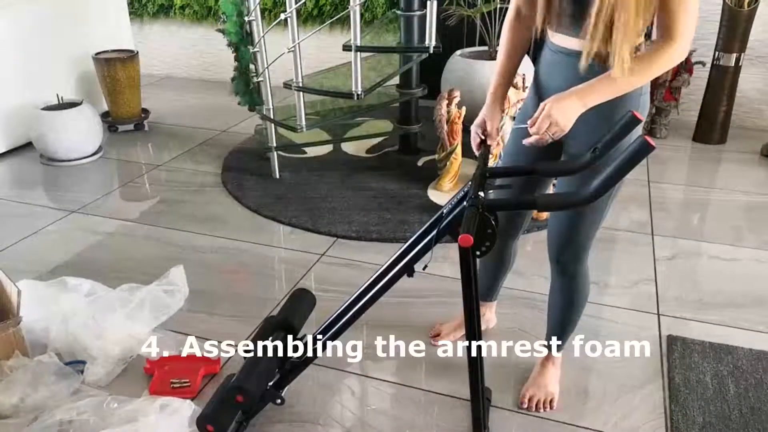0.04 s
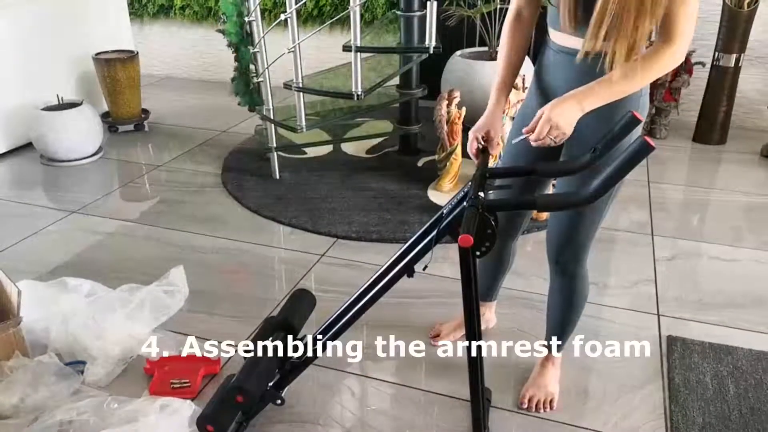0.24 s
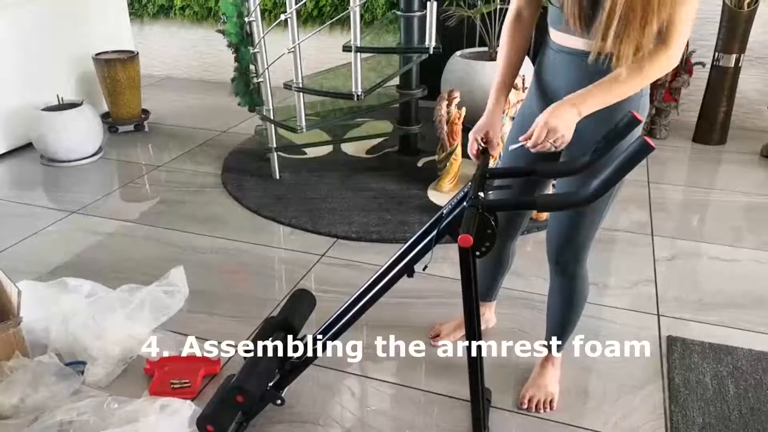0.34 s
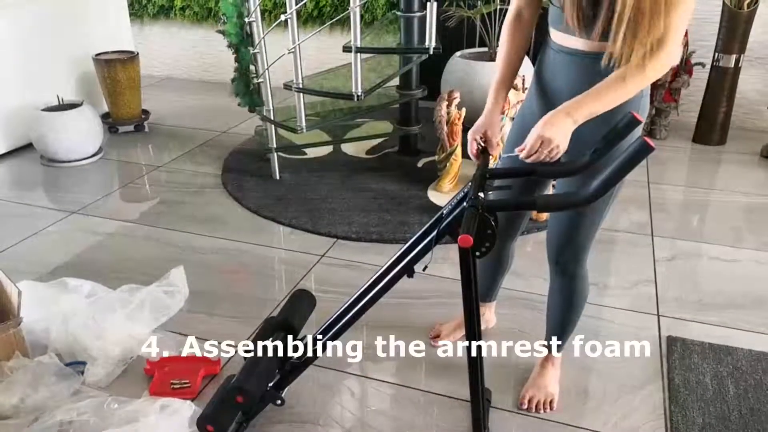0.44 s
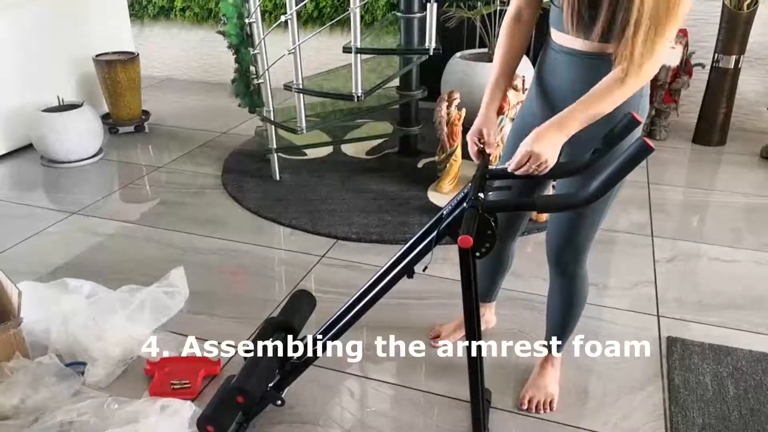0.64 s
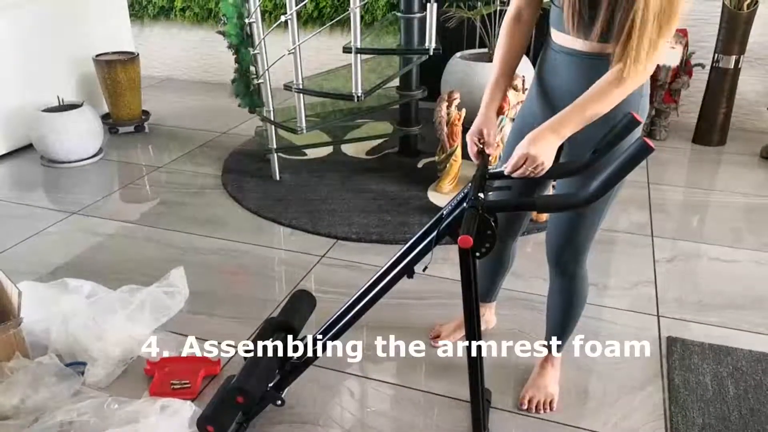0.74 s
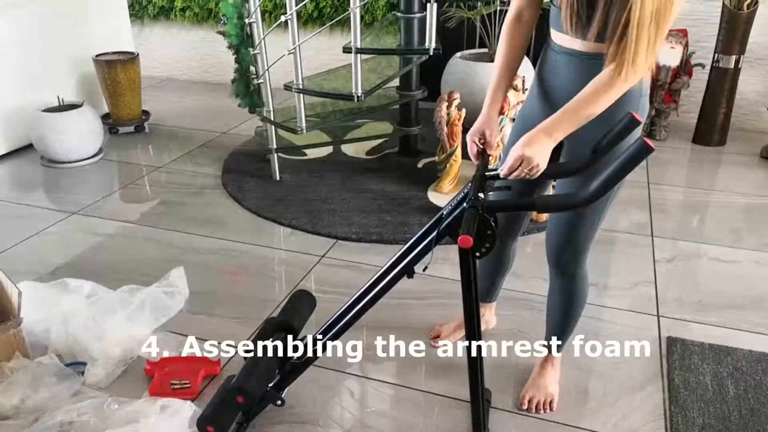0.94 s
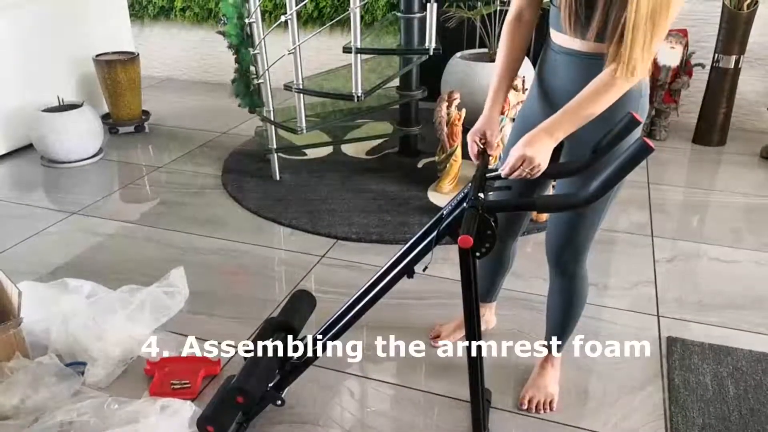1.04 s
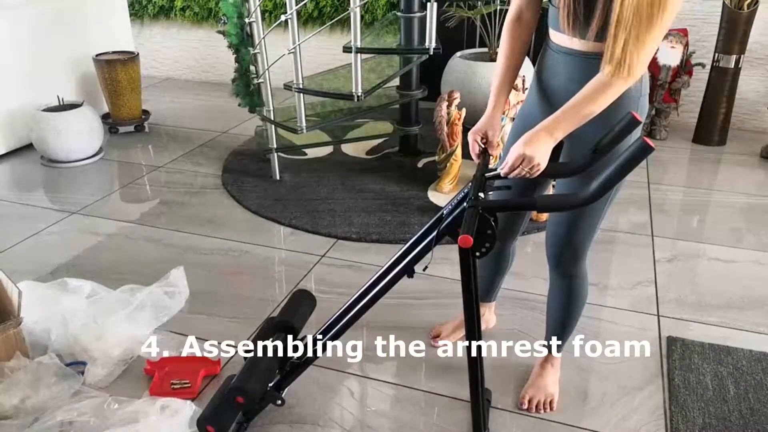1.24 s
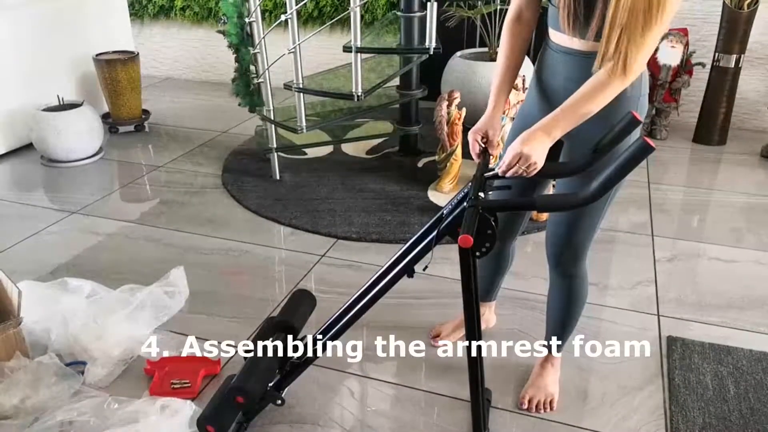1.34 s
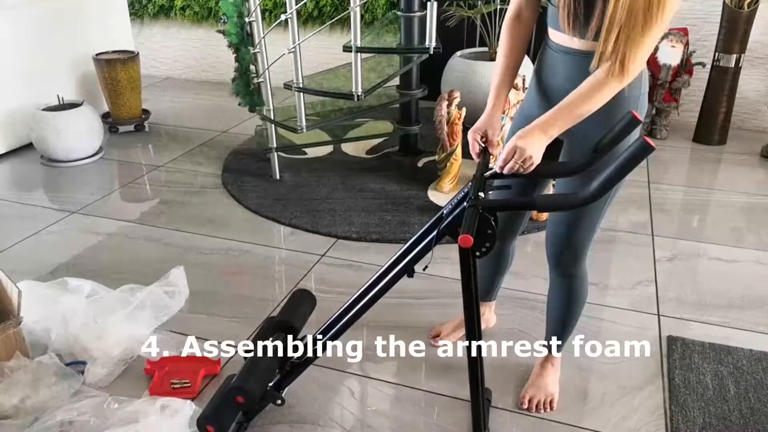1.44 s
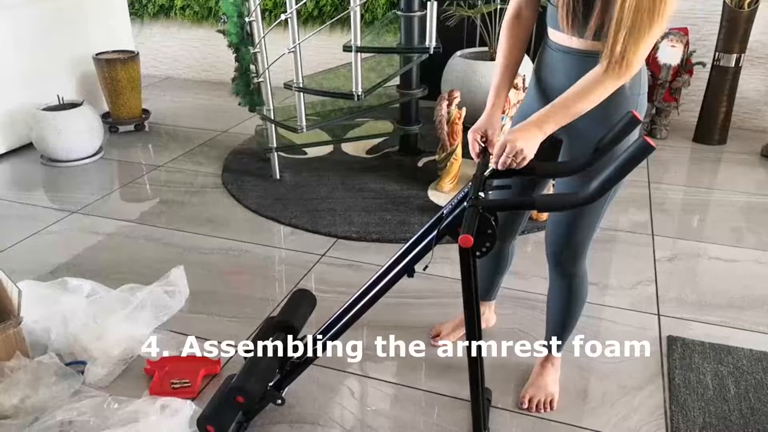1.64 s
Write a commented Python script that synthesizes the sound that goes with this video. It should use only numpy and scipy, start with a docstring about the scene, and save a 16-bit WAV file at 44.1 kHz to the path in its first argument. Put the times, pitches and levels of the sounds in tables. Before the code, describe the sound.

In a tiled room, a brief ringing metal scrape with a thin squeal ends in a soft bump as a part is pushed along a tube frame. Soft hand rubs and a few light clicks follow.

```python
"""A metal part is pushed along the tube frame of an exercise machine in a tiled room.
It scrapes in stick-slip pulses that ring the tube, squeals as the contact locks on to a mode,
then judders to a stop and shakes the frame. Hands rub softly over the parts and small
fittings click, over a faint room rumble."""
import sys
import numpy as np
from scipy import signal
from scipy.fft import rfft, irfft
from scipy.io import wavfile
from scipy.ndimage import uniform_filter1d

SR = 44100
rng = np.random.default_rng(int(sys.argv[2]) if len(sys.argv) > 2 else 0)


def persist_wave(psi):
    """Save psi, clipped to +-1, as 16-bit WAV."""
    counts = np.round(np.clip(psi, -1, 1) * 32767).astype(np.int16)
    wavfile.write(sys.argv[1], SR, np.atleast_2d(counts).T)


N = 74970
T, F = np.arange(N) / SR, np.arange(N // 2 + 1) * SR / N

# Course of the push. Each row: time in seconds, level in dB, slips per second, treble in dB.
PUSH_CURVE = [(0.318, -62, 230, 1), (0.336, -38, 230, 2.5), (.36, -46.5, 200, 10), (.425, -41, 190, 1.5),
              (0.457, -39, 180, 0), (0.496, -46.5, 190, 5), (0.539, -36, 150, -7), (0.563, -37.5, 120, -7),
              (0.594, -45.5, 145, -5.5), (0.643, -46, 145, -15), (.67, -61, 140, 3.5), (0.719, -69, 140, 3)]
# Tube modes. Each row: frequency in Hz, width in Hz, level in dB.
TUBE_MODES = [(805, 30, -9), (1140, 80, -8), (1805, 22, 1), (1872, 35, 1), (2050, 25, -3), (2240, 25, -3),
              (2328, 30, -2), (2430, 90, 0), (2822, 30, -2), (3405, 35, -4), (3620, 35, -4), (4015, 60, -8),
              (4760, 100, -11.5), (5300, 70, -12), (5735, 50, -16)]
# Dense frame resonances. Each row: frequency in Hz, level in dB.
FRAME_SPECTRUM = [(100, -27), (400, -14.5), (600, -15), (780, -8), (1450, -8.5), (1950, 0), (2600, 0.5),
                  (3100, -8.5), (5500, -12.5), (6500, -19.5), (7700, -11), (8400, -30.5), (14000, -65.5)]
def scrape():
    """Uneven slips, each a short burst of grit, ring the tube and the frame."""
    slip_decay_s, scatter_db, jitter, steady_grit = 0.00068, 0.2, .15, 0.25
    centre_share, frame_gain = 0.54, amp(-1)
    times_s, db, rate_hz, treble_db = np.array(PUSH_CURVE).T
    slip_hz = np.interp(T, times_s, rate_hz)
    slips = np.cumsum(slip_hz * np.exp(jitter * wander(150))) / SR
    slip_size = amp(scatter_db * rng.standard_normal(N))[slips.astype(int)]
    since_slip_s = slips % 1 / slip_hz
    grit = np.sqrt(centre_share) * rng.standard_normal((2, 1, N))  # alike left and right
    grit = grit + np.sqrt(1 - centre_share) * rng.standard_normal((2, 2, N))
    force = unit(grit * (slip_size * np.exp(-since_slip_s / slip_decay_s) + steady_grit))
    force = force * amp(np.interp(T, times_s, db, left=-120, right=-120))
    tube_force, frame_force = shelf(force, np.interp(T, times_s, treble_db), hz=3160)
    tube = np.array([ring(TUBE_MODES), ring(TUBE_MODES)])
    frame = energy(colour(signal.unit_impulse(N), FRAME_SPECTRUM))
    return (conv(tube_force, tube) + frame_gain * conv(frame_force, frame)) / np.hypot(1, frame_gain)


# Squeals. Each row: start in seconds, length in seconds, pitch in Hz, level in dB, waver as a share.
SQUEAL_EVENTS = [(.333, .015, 2841, -43.5, .006), (.374, .007, 2835, -45, .004),
                 (.385, .025, 2838, -41, .003), (.425, .086, 2820, -45.5, .003),
                 (.511, .02, 5738, -57, .003), (.572, .087, 5735, -67, .003), (.45, .012, 1090, -44, .04),
                 (.448, .02, 1850, -46, .02), (.22, .008, 1720, -48, .05), (.231, .024, 1730, -56, .05)]
def squeals():
    """The contact locks on to one mode for a moment and sings with a wavering pitch."""
    attack_s, release_s, flutter_db = 0.0048, 0.0014, 1.7
    out = 0
    for start_s, length_s, hz, db, waver in SQUEAL_EVENTS:
        t = T - start_s
        envelope = np.clip(t / attack_s, 0, 1) * np.exp(-np.maximum(t - length_s, 0) / release_s)
        tone = np.sqrt(2) * wavering_tone(hz, waver, rate_hz=242)
        out = out + amp(db + flutter_db * wander(160)) * envelope * tone
    return out


# Frame shudder. Each row: time in seconds, level in dB.
SHUDDER_CURVE = [(.15, -90), (.24, -73), (.37, -73), (.46, -55), (.52, -58), (0.543, -52), (.58, -54.5),
                 (.625, -55), (.68, -69.5), (.8, -73.5)]
# Shudder spectrum. Each row: frequency in Hz, level in dB.
SHUDDER_SPECTRUM = [(30, -20.5), (65, -8), (125, -4.5), (145, -13.5), (175, 1), (215, -11), (340, -14.5),
                    (550, -18.5), (1200, -44)]
def shudder():
    """The whole frame rumbles under the push and booms once as the part seats."""
    seat_s, boom_hz, boom_db, rise_s = .518, 176.3, -46.5, 0.0207
    times_s, db = np.array(SHUDDER_CURVE).T
    rumble = unit(diffuse_noise(SHUDDER_SPECTRUM)) * amp(np.interp(T, times_s, db))
    t = T - seat_s
    envelope = np.clip(t / rise_s, 0, 1) * fade(t - rise_s, t60_s=0.13)
    return rumble + amp(boom_db) * envelope * np.sin(2 * np.pi * boom_hz * t)


# Scuff as the part takes the load. Each row: time in seconds, level in dB.
SCUFF_CURVE = [(0.149, -75), (.195, -62), (0.242, -58), (.32, -63), (.37, -56.5), (.5, -70)]
# Scuff spectrum. Each row: frequency in Hz, level in dB.
SCUFF_SPECTRUM = [(100, -42), (220, 0), (320, 4.5), (560, -11), (800, 0), (1150, -1.5), (1500, 2),
                  (3000, -10.5), (7500, -15), (9000, -29)]
def scuff():
    """The part drags dully before it breaks loose."""
    times_s, db = np.array(SCUFF_CURVE).T
    drag = grainy_noise(SCUFF_SPECTRUM, grain_db=2.7, rate_hz=200)
    envelope = amp(np.interp(T, times_s, db, left=-120, right=-120))
    return room(drag * envelope, wet_db=3.5, pan_db=2)


# Hand rubs. Each row: start, rise, hold and T60 in seconds, then level, treble and pan in dB.
RUB_EVENTS = [(-.03, 0.014, 0.012, 0.53, -53, 4, -1.5), (0.136, 0.072, 0.077, 0.1, -54, -15, -0.5),
              (0.767, 0.0046, 0.0048, 0.095, -52, -26, -0.5), (1.091, 0.012, 0.11, 0.32, -56.5, 5, 2.5),
              (1.486, 0.0028, 0.0031, 0.17, -68.5, 13.5, -4), (1.545, 0.038, 0.043, .6, -73, -8, 3)]
# Rub spectrum. Each row: frequency in Hz, level in dB.
RUB_SPECTRUM = [(200, -15.5), (600, -10.5), (1250, -10.5), (1750, 0.5), (2500, 2.5), (3300, -1.5),
                (4050, -8), (4400, -16.5), (7500, -24), (8500, -30), (14000, -47)]
def rubs():
    """Soft grainy swishes as the hands shift the parts; each dulls as it slows."""
    dulling_db_per_s = 67
    out = 0
    for start_s, rise_s, hold_s, t60_s, db, treble_db, pan_db in RUB_EVENTS:
        t = T - start_s
        grains = grainy_noise(RUB_SPECTRUM, grain_db=1, rate_hz=330)
        envelope = np.clip(t / rise_s, 0, 1) * fade(t - rise_s - hold_s, t60_s)
        swish = shelf(grains, treble_db - dulling_db_per_s * np.maximum(t, 0), hz=2480)
        out = out + room(swish * envelope * amp(db), wet_db=3.5, pan_db=pan_db)
    return out


# Fitting clicks. Each row: start in seconds, then body, tick, thin ring and treble in dB.
CLICK_EVENTS = [(1.0443, -47, -43, -77, -12), (1.4657, -81, -58.5, -55.5, 15), (1.493, -68, -62, -61.5, 13),
                (1.504, -78, -60, -53, 12.5)]
# Fitting modes. Each row: frequency in Hz, width in Hz, level in dB.
FITTING_MODES = [(2008, 40, 2), (2821, 45, -2), (3208, 45, -1), (4130, 60, 1.5), (5529, 38, 1),
                 (6820, 70, -13), (7380, 90, -14)]
# Contact tick spectrum. Each row: frequency in Hz, level in dB.
TICK_SPECTRUM = [(300, -16), (1300, -12), (2200, 10), (5000, 0.5), (7700, 1), (8700, -26), (14000, -45)]
def clicks():
    """A small fitting knocks against the tube; light touches are brighter and leave a thin ring."""
    attack = np.minimum(T / 0.00065, 1)
    thin_ring = wavering_tone(hz=3975, waver=.022, rate_hz=400) * fade(T, t60_s=.05)
    out = 0
    for start_s, body_db, tick_db, ring_db, treble_db in CLICK_EVENTS:
        body = ring(FITTING_MODES)
        body = body / np.sqrt(np.mean(body[T < .005] ** 2))
        tick = unit(colour(rng.standard_normal(N), TICK_SPECTRUM)) * fade(T, t60_s=0.024)
        hit = (amp(body_db) * body + amp(tick_db) * tick + amp(ring_db) * thin_ring) * attack
        placed = np.pad(hit, (int(start_s * SR), 0))[:N]
        out = out + shelf(placed, treble_db, hz=5500)
    return room(out, wet_db=3, pan_db=2.5)


# Reverberation. Each row: frequency in Hz, T60 in seconds.
ROOM_DECAY = [(200, 0.28), (1000, 0.5), (2500, 0.5), (5000, 0.47), (10000, 0.1)]
def room(x, wet_db, pan_db):
    """Direct sound arrives on the right first; the near tiles, then the walls, answer diffusely."""
    delay_s = np.array([[0.0005714], [0]])
    hz, t60_s = np.array(ROOM_DECAY).T
    noise, tail = rfft(rng.standard_normal((2, N))), 0
    edges_hz = np.geomspace(100, SR / 2, 9)
    for lo, hi in zip(edges_hz, edges_hz[1:]):
        band = irfft(noise * ((F >= lo) & (F < hi)), N)
        tail = tail + band * fade(T, np.interp(np.sqrt(lo * hi), hz, t60_s))
    early_boost = 1 + 2.2 * fade(T, t60_s=0.08)
    tail = energy(tail * np.minimum(T / 0.00097, 1) * early_boost)
    direct = irfft(rfft(x) * np.exp(-2j * np.pi * F * delay_s), N)
    return pan((direct + amp(wet_db) * conv(x, tail)) / np.hypot(1, amp(wet_db)), pan_db)


# Room background. Each row: frequency in Hz, level in dB.
RUMBLE_SPECTRUM = [(20, -1), (45, -6), (70, 2.5), (125, -1), (200, -4.5), (330, -13), (600, -17.5),
                   (1400, -15), (1900, -11), (3000, -17), (5000, -25.5), (7500, -24), (8600, -34.5),
                   (15000, -37.5)]
def room_rumble():
    """Faint, steady, diffuse rumble."""
    return amp(-65) * unit(diffuse_noise(RUMBLE_SPECTRUM))


def diffuse_noise(spectrum):
    """Stereo noise: nearly alike on both sides in the bass, unrelated in the treble."""
    wide_hz = 392
    mid, side = rng.standard_normal((2, N))
    side = irfft(rfft(side) * np.clip((F / wide_hz) ** 2, .14, 1), N)
    return colour(np.array([mid + side, mid - side]), spectrum)


def grainy_noise(spectrum, grain_db, rate_hz):
    """Coloured noise with a flickering level, rms 1."""
    return unit(colour(rng.standard_normal(N) * amp(grain_db * wander(rate_hz)), spectrum))


def wavering_tone(hz, waver, rate_hz):
    """Sine whose pitch wanders by the share `waver`."""
    return np.sin(2 * np.pi * np.cumsum(hz * (1 + waver * wander(rate_hz))) / SR)


def ring(modes):
    """Impulse response of modes; each builds up quickly and radiates with its own phase."""
    tones = sum(amp(db) * width_hz * np.exp(-np.pi * width_hz * T)
                * np.sin(2 * np.pi * (hz * T + rng.random())) for hz, width_hz, db in modes)
    return energy(tones * np.minimum(T / 0.00026, 1))


def wander(rate_hz):
    """Smooth random curve, rms 1."""
    span = int(SR / rate_hz)
    return unit(uniform_filter1d(uniform_filter1d(rng.standard_normal(N), span), span))


def colour(x, spectrum):
    """Minimum-phase filter through (Hz, dB) points."""
    hz, db = np.array(spectrum).T
    gain = amp(np.interp(np.log(F + 1), np.log(hz), db))
    cepstrum = irfft(np.log(gain), N)
    cepstrum[1:N // 2] *= 2
    cepstrum[N // 2:] = 0
    return conv(x, irfft(np.exp(rfft(cepstrum)), N))


def shelf(x, db, hz):
    """Treble shelf; the gain may move."""
    low = signal.sosfiltfilt(signal.butter(2, hz, fs=SR, output="sos"), x)
    return low + (x - low) * amp(db)


def conv(x, response):
    """Play a sound through a response."""
    return irfft(rfft(x, 2 * N) * rfft(response, 2 * N))[..., :N]


def fade(t, t60_s):
    """Exponential decay from time 0."""
    return np.exp(-np.log(1000) * np.maximum(t, 0) / t60_s)


def pan(x, db):
    """Set the left side `db` above the right."""
    return x * amp([[db / 2], [-db / 2]])


def amp(db):
    """Decibels to gain."""
    return 10 ** (np.asarray(db) / 20)


def unit(x):
    """Scale to rms 1."""
    return x / np.sqrt(np.mean(x ** 2))


def energy(x):
    """Scale a response to energy 1."""
    return x / np.sqrt(np.sum(x ** 2, axis=-1, keepdims=True))


def scene():
    """The push, the handling around it and the quiet room."""
    squeal = squeals()
    push = room(scrape(), wet_db=-2, pan_db=2.5) + pan(squeal, db=1.5)
    squeal_reverb = amp(-6.5) * room(squeal, wet_db=7, pan_db=9)
    return push + squeal_reverb + scuff() + shudder() + rubs() + clicks() + room_rumble()


def record(dry):
    """Steep low-pass on the top treble."""
    cutoff_hz = 15650
    return signal.sosfilt(signal.ellip(10, .2, 70, cutoff_hz, fs=SR, output="sos"), dry)


dry = scene()
out = record(dry)
persist_wave(out)
```